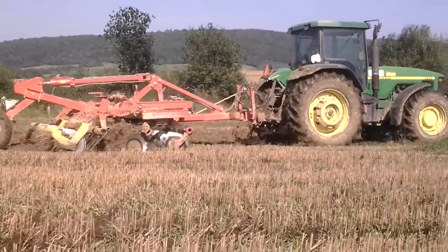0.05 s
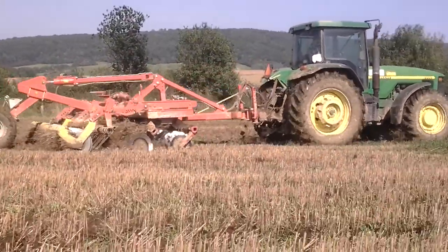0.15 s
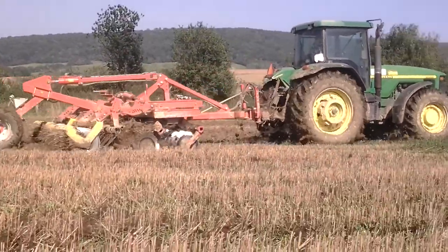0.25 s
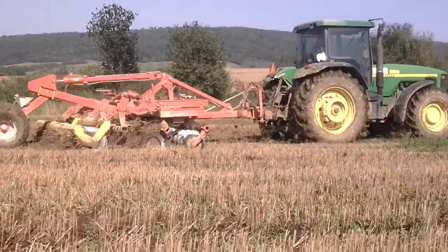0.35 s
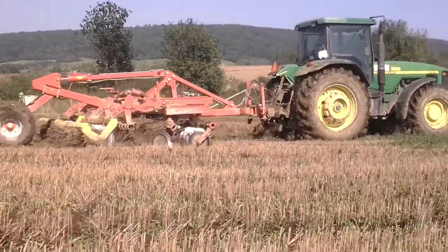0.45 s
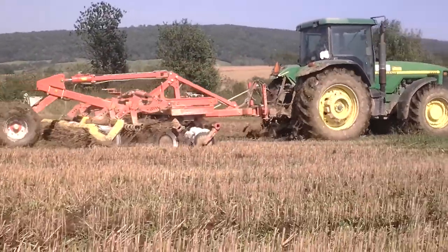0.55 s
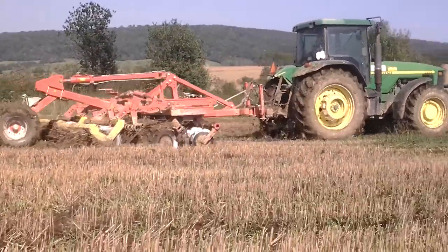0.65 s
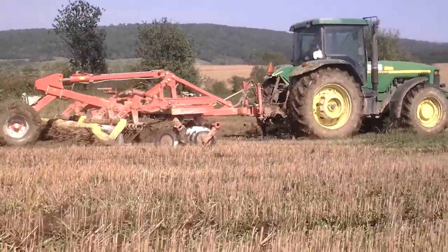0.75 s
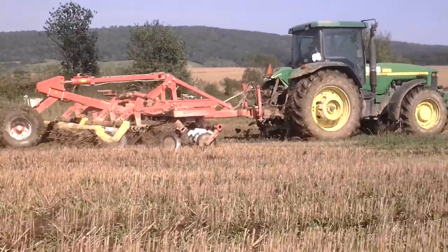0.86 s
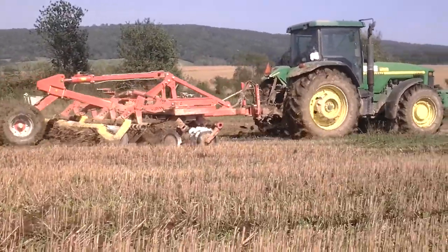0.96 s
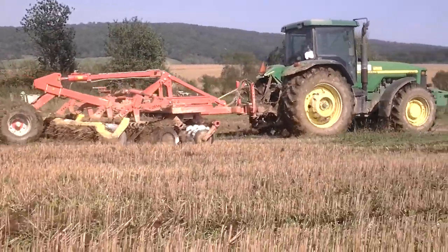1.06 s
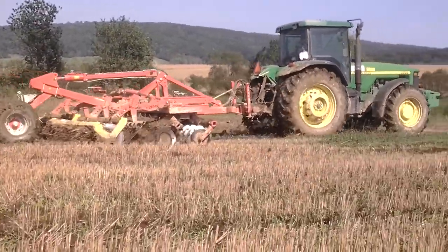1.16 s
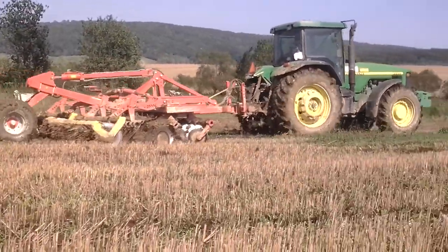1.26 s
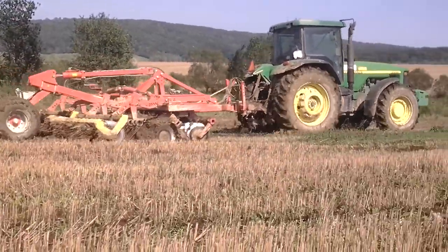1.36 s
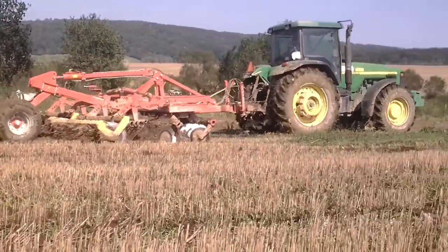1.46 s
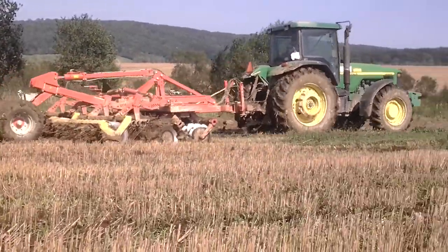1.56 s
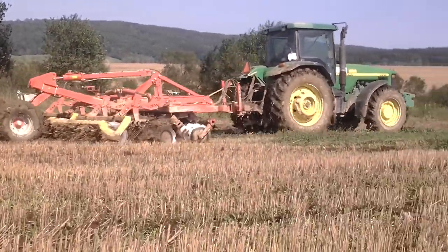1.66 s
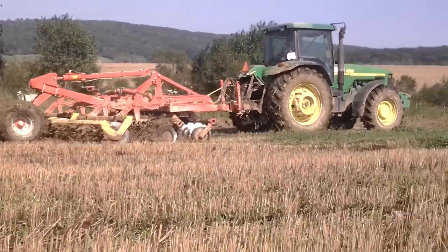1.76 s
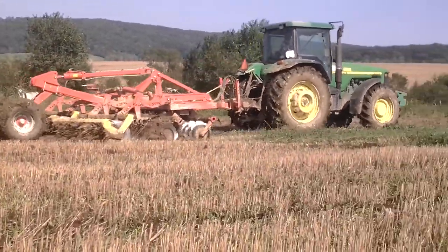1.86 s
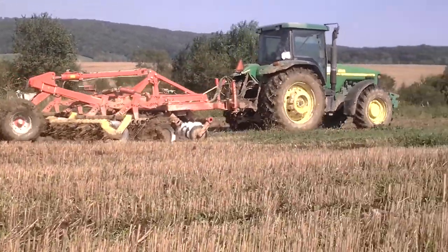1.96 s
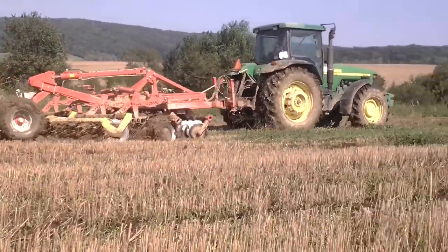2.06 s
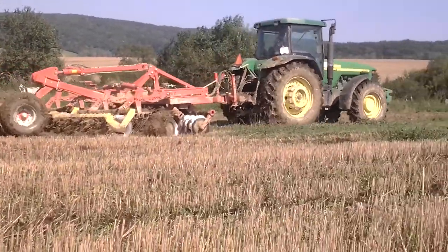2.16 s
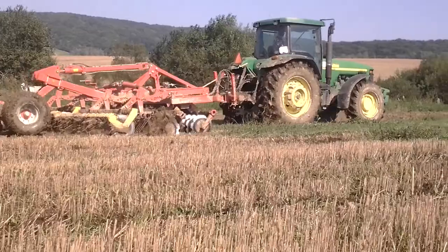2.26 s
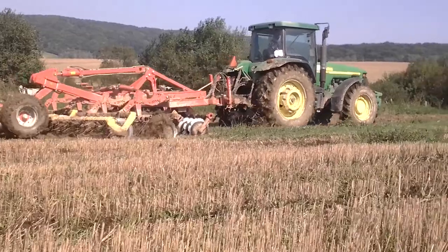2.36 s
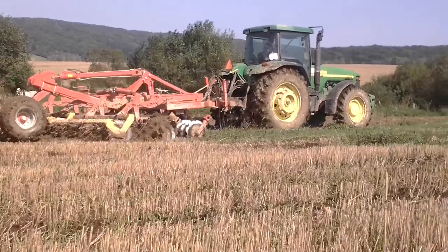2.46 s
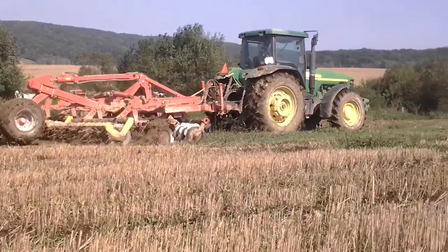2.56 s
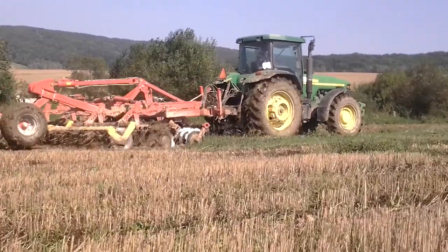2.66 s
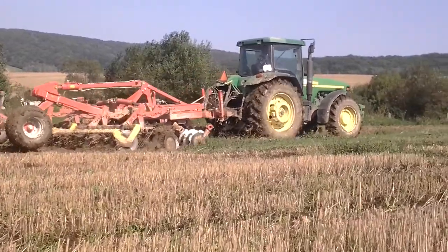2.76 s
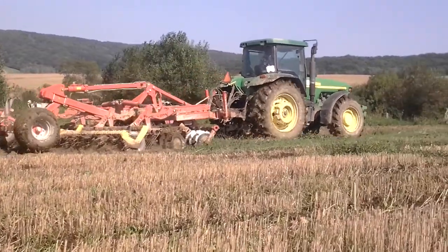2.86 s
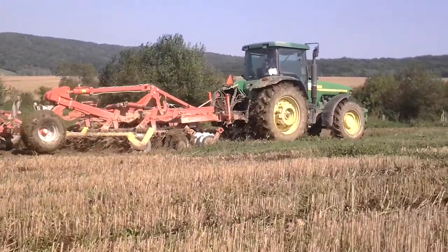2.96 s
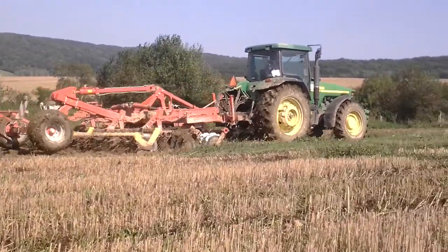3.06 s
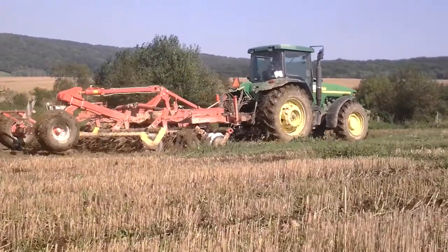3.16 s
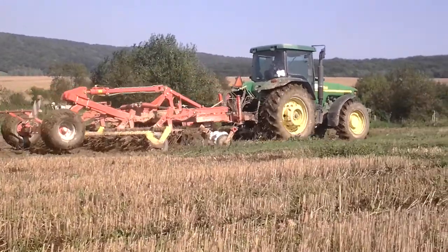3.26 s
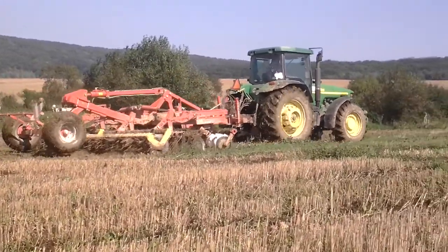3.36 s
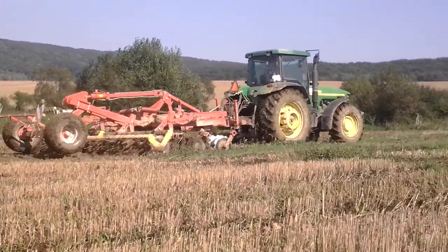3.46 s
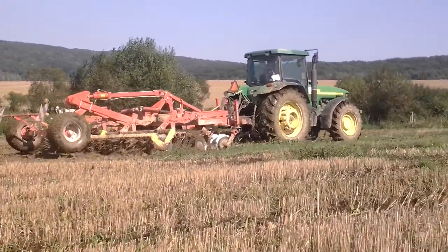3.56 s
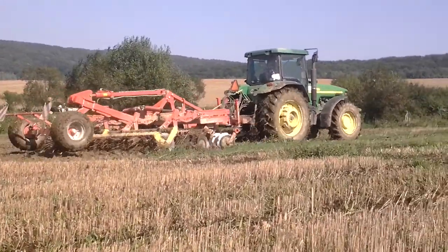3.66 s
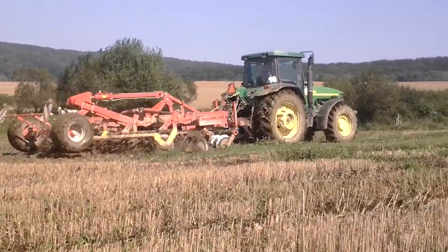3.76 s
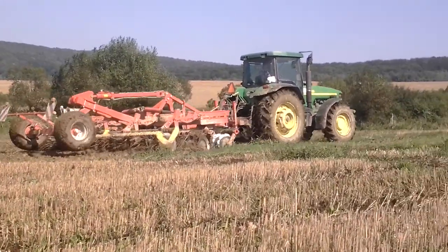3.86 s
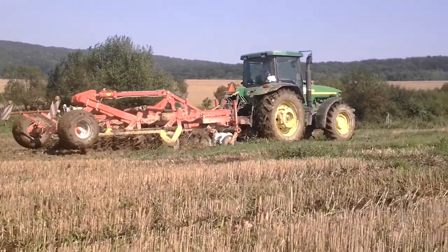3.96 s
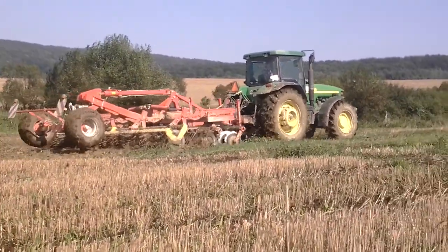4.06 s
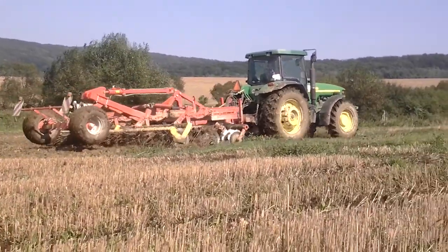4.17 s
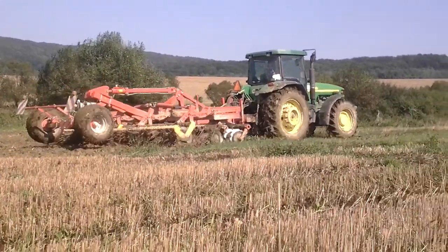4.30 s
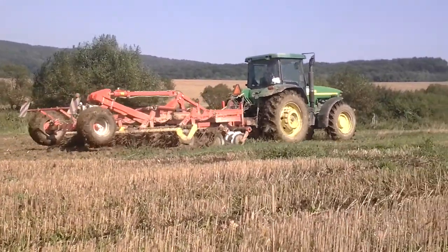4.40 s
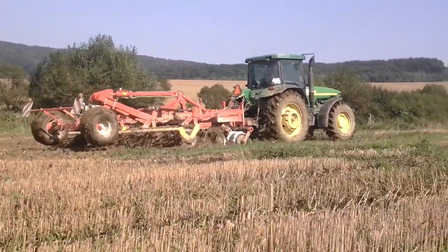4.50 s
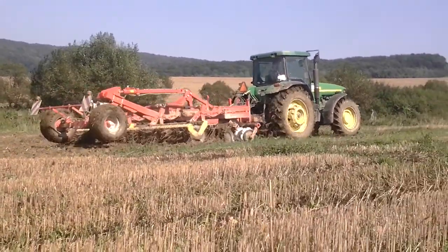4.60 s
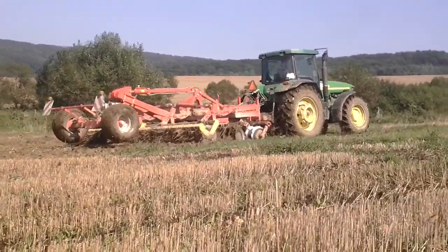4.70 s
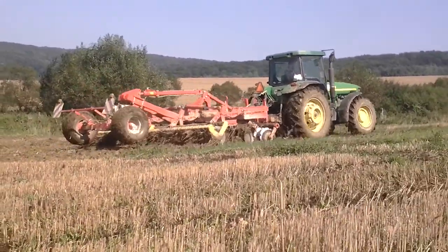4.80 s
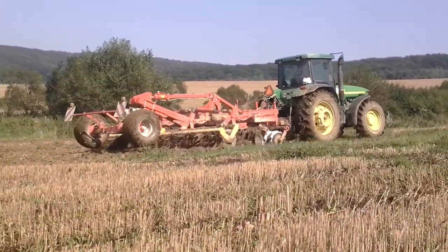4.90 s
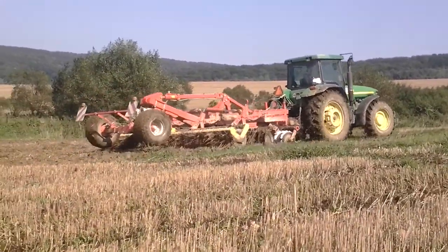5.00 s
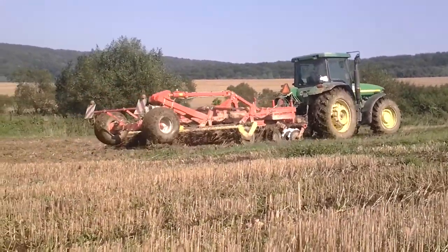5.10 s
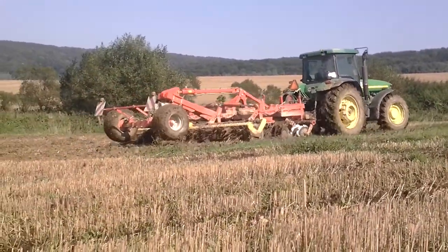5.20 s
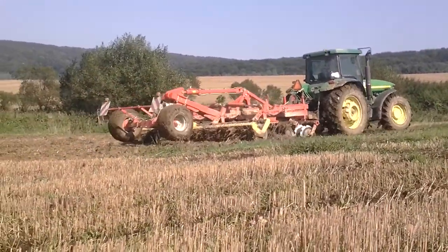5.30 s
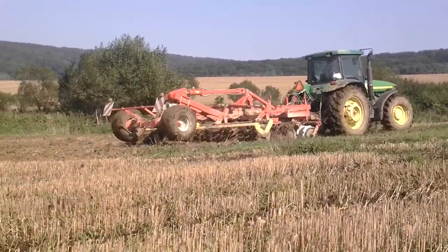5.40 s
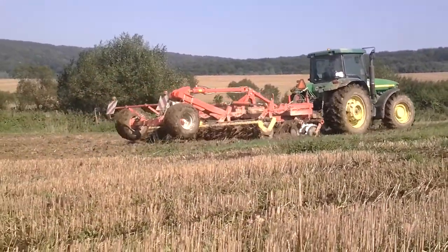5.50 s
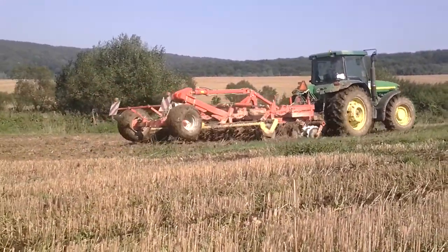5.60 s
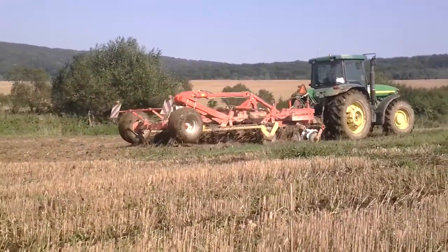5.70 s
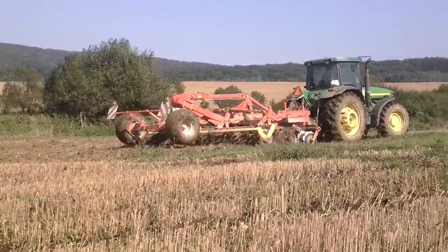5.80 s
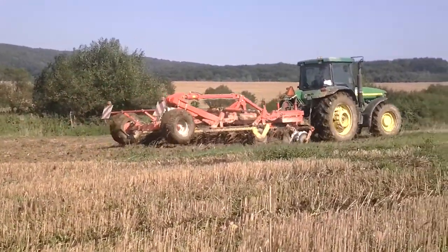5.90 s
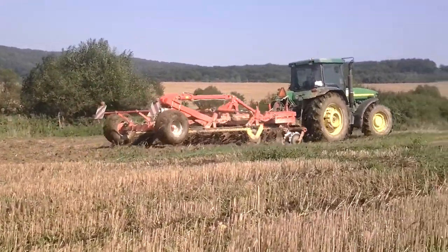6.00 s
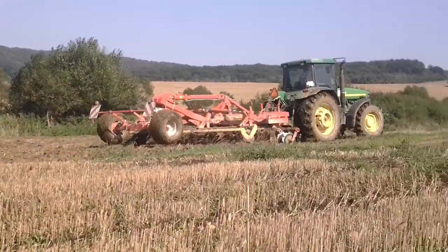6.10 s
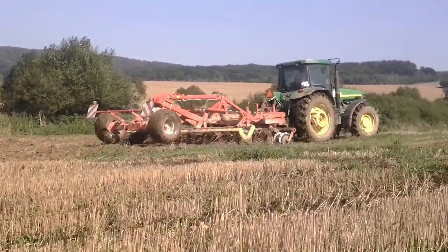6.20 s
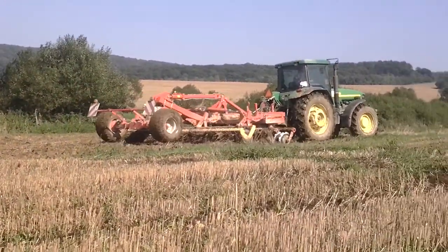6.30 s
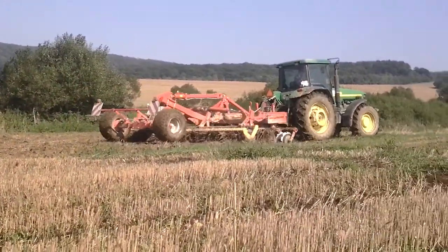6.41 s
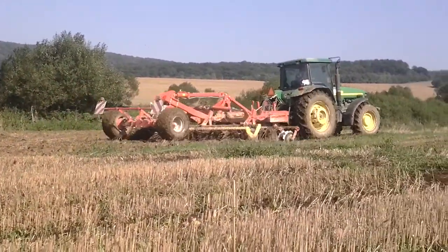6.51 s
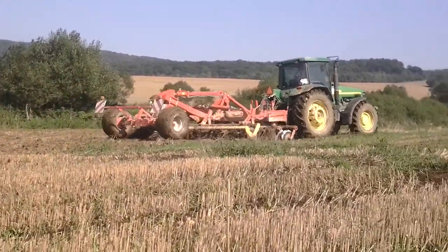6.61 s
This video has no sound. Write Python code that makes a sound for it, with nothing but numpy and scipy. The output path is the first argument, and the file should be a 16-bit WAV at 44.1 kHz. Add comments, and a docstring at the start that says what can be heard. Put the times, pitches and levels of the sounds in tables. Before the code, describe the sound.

A diesel tractor under load clatters and hums past, dragging a hissing, scraping disc harrow through dry stubble while wind knocks at the microphone.

```python
"""A six-cylinder turbo diesel tractor drags a disc harrow through dry stubble and draws away.
At once the exhaust hums in crank-locked tones, noise bursts clatter in the block and grains hiss off the discs.
Soon resonant discs scrape, a wavering turbo tone whistles and wind pulses knock on the microphone.
The revs and gear whine climb; then heavy soil drags the revs down and the turbo's pitch follows.
Late on the knocks crowd together and something dry, perhaps a grasshopper, buzzes in noisy strokes."""
import sys
import numpy as np
from scipy import signal
from scipy.fft import rfft, irfft, next_fast_len
from scipy.io import wavfile
from scipy.ndimage import map_coordinates

SR = 44100
rng = np.random.default_rng(int(sys.argv[2]) if len(sys.argv) > 2 else 0)


def log_audio(samples):
    """Write samples as a 16-bit WAV file to the path given in sys.argv[1]."""
    # one column per channel
    frames = np.atleast_2d(samples).T
    # limit to full scale, then quantise
    limited = np.clip(frames, -1, 1)
    pcm = np.round(limited * 32767).astype(np.int16)
    wavfile.write(sys.argv[1], SR, pcm)


N = 293251
TIME = np.arange(N) / SR  # s


def from_db(db):
    """Decibels to amplitude gain."""
    return 10 ** (np.asarray(db) / 20)


def rms_one(x):
    """Scale to unit power."""
    return x / np.sqrt(np.mean(x ** 2) + 1e-20)


def in_time(rows):
    """Each column of a timed curve, sample by sample."""
    s, *columns = np.transpose(rows)
    return [np.interp(TIME, s, column) for column in columns]


def coloured(x, spectrum):
    """Filter a sound by (frequency, dB) points, rolling off below the first; rms 1."""
    size = next_fast_len(N)
    hz, db = np.transpose(spectrum)
    bins = np.maximum(np.arange(size // 2 + 1) * SR / size, 1)
    gain = from_db(np.interp(np.log(bins), np.log(hz), db))
    gain *= np.minimum(bins / hz[0], 1) ** 2
    return rms_one(irfft(rfft(x, size) * gain, size)[:N])


def drift(rate):
    """A smooth random curve through `rate` normal values a second."""
    knots = rng.standard_normal(N // 20)
    return map_coordinates(knots, [TIME * rate + 2], order=2, mode="wrap")


def grains(per_s, spread_db):
    """Random clicks of uneven size and either sign; rms 1."""
    sizes = from_db(spread_db * np.minimum(rng.exponential(1, N), 4))
    signs = rng.choice([-1, 1], N)
    return rms_one(sizes * signs * (rng.random(N) < per_s / SR))


def swell(start, length, edge_s):
    """Rise, hold and fall, with soft edges."""
    to_nearest_end = np.minimum(TIME - start, start + length - TIME)
    return np.clip(.5 + to_nearest_end / edge_s, 0, 1)


def tone(hz, wander_hz, flicker_db, flicker_rate):
    """A sine whose pitch and strength tremble at random; rms 1."""
    phase = 2 * np.pi * np.cumsum(hz + wander_hz * drift(flicker_rate)) / SR
    return rms_one(np.sin(phase) * from_db(flicker_db * drift(flicker_rate)))


def gust_lift():
    """Gusts carry the rig's sound to the microphone: quick rise, hold, decay; the strongest rules. In dB."""
    # gusts: (start [s], hold [s], lift [dB])
    gust_rows = [(0.04, 0.04, 4.5), (0.249, 0.048, 4), (0.424, 0.13, 2.5), (0.648, 0.13, 1),
                 (0.8, 0.1, 1.5), (1.004, 0.066, 2.5), (1.256, 0.1, 3.5), (1.666, 0.097, 2),
                 (1.744, 0.06, 4.5), (1.9, 0.13, 2), (2.134, .15, 2), (2.39, 0.1, 0.5), (2.872, .02, 4),
                 (3.08, 0.093, 2.5), (3.294, 0.2, 2), (3.789, 0.041, 4), (4.384, 0.13, 1),
                 (4.552, 0.052, 1), (4.77, 0.041, 2.6), (5.2, 0.041, 2), (5.43, 0.047, 3), (6.44, 0.11, 1)]
    attack_s, release_s = 0.035, 0.062
    start, hold, lift_db = np.transpose(gust_rows)[:, :, None]
    age = TIME - start
    rise = np.clip(age / attack_s, 0, 1)
    fall = np.exp(-np.maximum(age - hold, 0) / release_s)
    return np.max(lift_db * rise * fall, axis=0)


def engine_lines(cycles, lines, waver_db, stray, body=((1, 0),)):
    """Crank-locked tones slide through the body's resonances; those off the firing rate stray most in phase."""
    out, cycle_hz = 0, np.gradient(cycles) * SR
    for order, db in lines:
        loose = stray if order % 6 else stray / 4  # rad
        phase = 2 * np.pi * (order * cycles + rng.random()) + loose * drift(9.8)
        body_db = np.interp(order * cycle_hz, *np.transpose(body))
        strength = from_db(db + body_db + waver_db * drift(17))
        out = out + np.sqrt(2) * strength * np.sin(phase)
    return out


def hum_fading(lift_db):
    """The hum swells with each gust and its level dips briefly now and then. In dB."""
    # brief level dips of the hum; negative depths lift it: (centre time [s], depth [dB])
    dip_rows = [(.02, 1), (.275, 1.5), (.585, 8), (.96, 4.5), (1.205, 7), (1.44, 2), (1.62, 6), (1.915, 14),
                (2.145, 9), (2.39, 14), (3.0, 17), (3.22, 10), (3.52, 13), (3.81, -1), (4.0, 20), (4.39, 2),
                (5.06, 0), (5.36, 2)]
    width_s, gust_share = 0.039, 0.48
    s, depth_db = np.transpose(dip_rows)[:, :, None]
    distance = np.minimum(np.abs(TIME - s) / width_s, 10)
    return gust_share * lift_db - np.sum(depth_db * np.exp(-distance ** 2), axis=0)


def exhaust_hum(cycles, hum_db, lift_db):
    """Exhaust pulses sum to harmonics of the cycle rate, shaped by the silencer's peaks and dips."""
    # exhaust lines: (multiple of the four-stroke cycle rate [x], level before the silencer [dB])
    exhaust_lines = [(6, -18.5), (9, -13.5), (10, -15), (11, -13), (12, -0.5), (13, -14), (14, -8.5),
                     (15, -10), (16, -15.5), (17, -26), (18, -7.5), (20, -29), (24, -13.5), (26, -15),
                     (27, -16.5), (30, -14)]
    # silencer response: (frequency [Hz], gain [dB])
    silencer = [(85, 6), (108, 1.5), (130, -4), (150, 0.5), (170, 3), (205, 2.5), (222, -7), (255, -0.5),
                (300, -10), (345, 1), (405, 3), (440, -13), (500, -3)]
    lines = engine_lines(cycles, exhaust_lines, waver_db=1.5, stray=0.51, body=silencer)
    return from_db(hum_db + hum_fading(lift_db)) * lines


def combustion(cycles, repeat_share):
    """Broad force of burning fuel: part comes back alike on every cycle, part is new."""
    cycle_length = SR // 16  # table samples per cycle
    pattern = rng.standard_normal(cycle_length)
    alike = map_coordinates(pattern, [cycles % 1 * cycle_length], order=2, mode="grid-wrap")
    return np.sqrt(repeat_share) * alike + np.sqrt(1 - repeat_share) * rng.standard_normal(N)


def clatter(cycles, decay, sustain, repeat_share, uneven_db):
    """Each firing knocks the block, every cylinder with its own strength; decay in firing intervals."""
    # mean knock of each cylinder in firing order: level [dB]
    cylinder_db = [0, 5, 3.5, 1, -25, -8]
    # clatter spectrum: (frequency [Hz], relative density [dB per Hz])
    clatter_colour = [(300, -23), (600, -15.5), (730, -6.5), (880, -9.5), (1020, -1), (1300, 0.4),
                      (1520, -4), (1720, -20), (1920, -8), (2300, -18.5), (2600, -12), (3200, -18.5),
                      (4200, -18.5), (8000, -79)]
    firing, since = np.divmod(len(cylinder_db) * cycles, 1)
    firing = firing.astype(int)
    chance_db = uneven_db * rng.standard_normal(N // 100)[firing]
    strength = from_db(np.take(cylinder_db, firing, mode="wrap") + chance_db)
    envelope = sustain + strength * np.exp(-since / decay)
    return coloured(combustion(cycles, repeat_share) * envelope, clatter_colour)


def engine_block(cycles, clatter_db, lift_db):
    """Knocks and tones that follow the engine speed leave the block; the tones shift as the tractor turns."""
    # times of the side-on, angled and rear views: time [s]
    view_s = [1.15, 2.0, 3.4]
    # block tones: (multiple of the cycle rate [x], side-on [dB], at an angle [dB], from behind [dB])
    line_rows = [(60.4, -31, -16, -28), (61.1, -20, -13, -23), (65.9, -12.5, -14, -21),
                 (69, -20, -10.5, -14), (74.7, -13.5, -12.5, -19), (78.1, -10.5, -17, -15.5),
                 (79.4, -18, -12, -29), (84.2, -10, -12, -17), (90, -33, -11, -24), (92.2, -20, -24, -21)]
    gust_share = 1.24
    knocking = clatter(cycles, decay=0.4, sustain=3.5, repeat_share=0.1, uneven_db=5.5)
    lines = [(order, np.interp(TIME, view_s, db)) for order, *db in line_rows]
    block_tones = engine_lines(cycles, lines, waver_db=2.5, stray=1.08)
    return from_db(clatter_db + gust_share * lift_db - 5.0) * (knocking + block_tones)


def low_rumble(cycles, clatter_db, lift_db):
    """Low combustion noise that fades only a little as the clatter falls below its loudest."""
    # rumble spectrum: (frequency [Hz], relative density [dB per Hz])
    rumble_colour = [(25, -17), (60, -18), (110, -20), (150, -10), (200, -9), (260, 0), (380, -2),
                     (440, -8), (500, -11.5), (680, -8.5), (900, -18.5), (1200, -19), (2000, -77)]
    top_db, fade_share, gust_share = -31.7, 0.056, 0.69
    fade_db = fade_share * (clatter_db - clatter_db.max())
    noise = coloured(combustion(cycles, repeat_share=0.3), rumble_colour)
    return from_db(top_db + fade_db + gust_share * lift_db) * noise


def gear_whine(cycle_hz):
    """Meshing teeth whine at a fixed multiple of the cycle rate."""
    # gear whine: (time [s], level [dB])
    whine_level = [(0, -53), (2.6, -34), (3, -31.5), (3.7, -29.5), (4.1, -37), (4.5, -43), (6.65, -40)]
    whine = tone(88.1 * cycle_hz, wander_hz=7.1, flicker_db=-1.5, flicker_rate=54)
    return from_db(in_time(whine_level)[0]) * whine


def turbo_sound(lift_db):
    """The compressor blades whistle; a broad high hiss lies around the whistle and fades faster than it does."""
    # whistle, sinking a little after the revs do: (time [s], pitch [Hz])
    whistle_pitch = [(0, 11190), (2.6, 11215), (3.3, 11270), (4.1, 11270), (4.65, 11190), (5.1, 11120),
                     (5.5, 10970), (6, 10650), (6.65, 10300)]
    # turbo between gusts, before its random flicker: (time [s], level [dB])
    whistle_level = [(0, -56.5), (.7, -42.5), (1.05, -53.5), (1.8, -50), (2.45, -49), (2.65, -41),
                     (2.75, -50), (3, -53.5), (3.4, -51.5), (3.8, -63), (5.5, -57.5), (6.1, -64.5),
                     (6.65, -59)]
    # high hiss: (frequency [Hz], relative density [dB per Hz])
    high_hiss_colour = [(8500, -58), (9400, 9), (10600, 4), (11500, 0.5), (12300, -1)]
    gust_share, slow_flicker_db = 1.3, 2.5
    hiss_db, hiss_fade_share = 0.5, 1  # against the whistle: level at its loudest, extra fading per dB
    hz, = in_time(whistle_pitch)
    db, = in_time(whistle_level)
    below_top_db = db - db.max()
    wander_hz = 80 * from_db(0.14 * below_top_db)  # calms as the whistle fades
    whistle = tone(hz, wander_hz, flicker_db=4.0, flicker_rate=440)
    hiss_gain = from_db(hiss_db + hiss_fade_share * below_top_db + slow_flicker_db * drift(45))
    high_hiss = hiss_gain * coloured(rng.standard_normal(N), high_hiss_colour)
    return from_db(db + gust_share * lift_db + slow_flicker_db * drift(23)) * (whistle + high_hiss)


def discs(per_s, spread_db, surge_db):
    """Straw snaps and soil crumbles along the discs in dense, surging grains."""
    # hiss spectrum: (frequency [Hz], relative density [dB per Hz])
    hiss_colour = [(900, -19), (1500, 7), (2000, 3), (2350, -2.5), (2800, 3), (3600, 2), (4050, -2),
                   (4700, 1), (5600, -1), (6150, -11), (7400, -13), (8400, -32.5), (9600, -28.5),
                   (12000, -102)]
    return coloured(grains(per_s, spread_db) * from_db(surge_db * drift(45)), hiss_colour)


def disc_mode(hz, width_hz, per_s, bend_share):
    """One soil-damped mode struck by grit; its pitch bends as the load on the disc changes; rms 1."""
    band = signal.butter(2, width_hz / 2, fs=SR, output="sos")
    # bring the mode down to 0 Hz, narrow it, then return it with a bending pitch
    shifted = grains(per_s, spread_db=4.0) * np.exp(-2j * np.pi * hz * TIME)
    ring = signal.sosfilt(band, shifted)
    phase = 2 * np.pi * np.cumsum(hz * (1 + bend_share * drift(6))) / SR
    return rms_one(np.real(ring * np.exp(1j * phase)))


def disc_ring(per_s, bend_share, swell_db):
    """Grit strikes the discs; each mode swells and fades as its disc bites deeper or rides up."""
    # ringing modes of the steel discs: (frequency [Hz], width [Hz], relative level [dB])
    mode_rows = [(2761, 100, 1.5), (3098, 62, -1.5), (3463, 220, -1), (3694, 99, -4), (4920, 110, -8.5),
                 (5240, 180, -3), (5950, 540, -6)]
    out = 0
    for hz, width_hz, db in mode_rows:
        level = from_db(db + swell_db * drift(6.9))
        out = out + level * disc_mode(hz, width_hz, per_s, bend_share)
    return rms_one(out)


def scrapes(edge_share):
    """Hard ground drives one mode of one disc for a while; longer scrapes swell and fade more slowly."""
    # squealing scrapes: (start [s], length [s], frequency [Hz], width [Hz], level [dB])
    scrape_rows = [(.5, 0.69, 2860, 700, -27.5), (1.9, 0.96, 2760, 70, -36), (2.15, 0.59, 3040, 750, -27),
                   (3.32, 0.088, 3420, 250, -35), (4.552, 0.22, 3380, 400, -30),
                   (4.55, 0.62, 4660, 250, -38), (5.427, 0.074, 2960, 450, -29),
                   (6.36, 0.41, 2710, 350, -33.5)]
    out = 0
    for s, length, hz, width_hz, db in scrape_rows:
        envelope = from_db(db) * swell(s, length, edge_share * length)
        out = out + envelope * disc_mode(hz, width_hz, per_s=1500, bend_share=.008)
    return out


def disc_harrow(hiss_db, lift_db):
    """Grains hiss along the discs, grit makes them ring and hard ground makes them squeal."""
    # disc ringing: (time [s], level against the hiss [dB])
    ring_level = [(0, -11.5), (.8, -2), (1.4, -8), (2, -3.5), (2.5, -3), (2.9, -6.5), (3.6, -6.5),
                  (4.5, -29), (5.5, -4), (6.65, -19)]
    gust_share = 1.5
    hiss = discs(per_s=12000, spread_db=2.5, surge_db=1.2)
    ringing = disc_ring(per_s=2700, bend_share=.005, swell_db=2.1)
    steady = hiss + from_db(in_time(ring_level)[0]) * ringing
    return from_db(hiss_db + gust_share * lift_db - 3.5) * steady + scrapes(edge_share=0.42)


def dry_buzz(sharpness):
    """Evenly spaced rasping noise strokes, each swelling and fading."""
    # dry buzz: (time [s], relative level [dB])
    buzz_level = [(0, -53), (3.8, -39), (4.3, -37), (4.6, -29.5), (4.95, -34.5), (5.3, -30), (5.6, -36),
                  (6, -42), (6.35, -35.5), (6.65, -38)]
    # buzz spectrum: (frequency [Hz], relative density [dB per Hz])
    buzz_colour = [(1200, 5), (2300, 2.5), (3000, 6.5), (3600, 9), (4600, 7), (5500, 2), (6200, -3),
                   (8000, -57)]
    strokes_hz = 69.4
    stroke = np.exp(sharpness * np.cos(2 * np.pi * strokes_hz * TIME))
    rasp = coloured(rng.standard_normal(N) * stroke, buzz_colour)
    return from_db(in_time(buzz_level)[0] + 3.5) * rasp


def wind_knocks(port_hz, port_damping, fall_ratio, flutter_db, edge_s):
    """Eddies suck sharply at the port and let go slowly, it swings back; small ones flutter in buffets."""
    # wind knocks on the microphone: (time [s], peak level [dB], sharpness [Hz])
    knock_rows = [(0.577, -17, 300), (1.7539, -14, 260), (1.764, -18, 400), (1.7865, -7.5, 450),
                  (1.924, -18, 350), (1.9407, -10, 360), (1.948, -8, 700), (1.955, -14, 300),
                  (2.1731, -5.5, 850), (2.2744, -10.5, 400), (2.282, -22, 240), (2.42, -16, 420),
                  (2.767, -15.5, 450), (2.909, -3.5, 750), (2.9105, -16, 650), (2.9152, -4.5, 560),
                  (2.917, -11, 546), (2.981, -6.5, 720), (3.031, -13.5, 450), (3.1393, -10.5, 320),
                  (3.1462, -7.5, 450), (3.173, -16, 380), (3.189, -13, 500), (3.216, -11, 380),
                  (3.806, -13, 300), (4.4057, -4, 620), (4.4242, -11, 450), (4.4386, -9, 350),
                  (4.4645, -8.5, 430), (4.4727, -3, 500), (4.51, -16, 330), (4.525, -12, 330),
                  (4.55, -16, 400), (4.5689, -7, 320), (4.5759, -11, 370), (4.594, -10, 300),
                  (4.612, -12, 330), (4.616, -13, 650), (4.623, -10, 480), (4.654, -4, 462),
                  (4.678, -20, 300), (4.689, -12, 380), (4.705, -10.5, 430), (4.709, -11.5, 430),
                  (4.741, -14, 260), (4.785, -11, 280), (4.828, -1.5, 323), (4.863, -3, 340),
                  (4.8692, -1, 410), (4.8773, -26, 220), (4.899, -15, 350), (4.921, -12, 380),
                  (4.9304, -11, 260), (4.937, -12, 500), (4.9462, -18, 240), (4.9603, -6.5, 650),
                  (4.965, -7.5, 350), (4.9902, -12, 240), (5.0084, -10, 400), (5.0157, -9, 300),
                  (5.0213, -22, 240), (5.2082, -15, 300), (5.25, -1.5, 343), (5.2661, -11, 350)]
    # fluttering buffets around the knocks: (start [s], length [s], relative level [dB])
    buffet_rows = [(.555, 0.03, -18.5), (1.745, 0.072, -29), (1.92, 0.027, -17), (2.885, 0.061, -22),
                   (3.09, 0.16, -25), (3.797, 0.14, -33), (4.412, 0.032, -17), (4.45, 0.063, -30),
                   (4.552, 0.16, -22.5), (4.737, 0.13, -30), (4.863, 0.13, -23), (5.185, 0.068, -21)]
    # flutter spectrum: (frequency [Hz], relative density [dB per Hz])
    flutter_colour = [(70, -32), (150, -1), (270, 30), (430, 16), (600, 15), (900, -1), (2000, -91)]
    w = 2 * np.pi * port_hz
    port = signal.bilinear([1, 0, 0], [1, port_damping * w, w * w], SR)
    lead = SR // 200  # samples before the centre of the suck
    age = np.arange(-lead, 10 * lead) / SR
    skewed_age = np.where(age < 0, age * fall_ratio, age / fall_ratio)
    out = np.zeros(N)
    for s, db, hz in knock_rows:
        suck = -np.exp(-.5 * (2 * np.pi * hz * skewed_age) ** 2)
        pulse = signal.lfilter(*port, suck)
        start = round(s * SR) - lead
        out[start:start + len(age)] += from_db(db) * pulse / np.abs(pulse).max()
    buffeting = sum(from_db(db) * swell(s, length, edge_s) for s, length, db in buffet_rows)
    eddies = coloured(grains(per_s=600, spread_db=2.5), flutter_colour)
    return out + from_db(flutter_db) * buffeting * eddies


def scene():
    """Engine, harrow and near sounds at one microphone."""
    # exhaust note, twice the firing rate, sagging as the soil gets heavy: (time [s], pitch [Hz])
    exhaust_note = [(0, 196.3), (.2, 196.2), (.8, 200.8), (1.2, 199.4), (1.5, 200.2), (1.72, 202),
                    (2.28, 199.5), (2.55, 203.2), (2.72, 203.9), (3.08, 209), (3.42, 207.6), (3.6, 207.9),
                    (3.88, 205.7), (4.08, 206.3), (4.5, 200.4), (4.68, 196.8), (4.95, 193.3), (5.2, 188),
                    (5.45, 179.5), (5.72, 173.3), (6.27, 172.3), (6.65, 176)]
    # the rig drawing away, between gusts; relative levels:
    # (time [s], exhaust hum [dB], block clatter [dB], disc hiss [dB])
    rig_levels = [(0, -31, -21, -22), (.65, -27.5, -16.5, -19), (1.2, -28.5, -18.5, -22),
                  (1.6, -33, -21.5, -22.5), (2.1, -27, -19, -20.5), (2.6, -29, -16.5, -18),
                  (2.85, -30, -21, -22), (3.1, -28, -20, -22), (3.65, -33.5, -23, -24),
                  (4.0, -36, -24.5, -24.5), (4.65, -30.5, -25, -21.5), (5.35, -34, -28, -23),
                  (5.95, -33, -30, -25.5), (6.3, -33, -30, -25), (6.65, -35.5, -31, -24.5)]
    note_hz, = in_time(exhaust_note)
    cycle_hz = note_hz / 12  # six firings a cycle, and the note is twice that
    cycles = np.cumsum(cycle_hz) / SR
    hum_db, clatter_db, hiss_db = in_time(rig_levels)
    lift_db = gust_lift()
    hum = exhaust_hum(cycles, hum_db, lift_db)
    block = engine_block(cycles, clatter_db, lift_db)
    rumble = low_rumble(cycles, clatter_db, lift_db)
    gears = gear_whine(cycle_hz)
    turbo = turbo_sound(lift_db)
    harrow = disc_harrow(hiss_db, lift_db)
    rasp = dry_buzz(sharpness=1.7)
    wind = wind_knocks(port_hz=240, port_damping=1.0, fall_ratio=1.28, flutter_db=-3.0, edge_s=0.045)
    return (hum + block + rumble + gears + turbo + harrow + rasp + wind)[None]


def record(dry):
    """A small microphone: the highest peaks rounded, deep bass thinned, the top cut steeply."""
    low_cut_hz, top_cut_hz, ceiling = 100, 12400, 1.0
    rounded = dry / (1 + (dry / ceiling) ** 6) ** (1 / 6)
    low_cut = signal.butter(2, low_cut_hz, "high", fs=SR, output="sos")
    top_cut = signal.ellip(10, .05, 60, top_cut_hz, fs=SR, output="sos")
    thin = signal.sosfilt(low_cut, rounded)
    return signal.sosfiltfilt(top_cut, thin)


dry = scene()
out = record(dry)
log_audio(out)
```